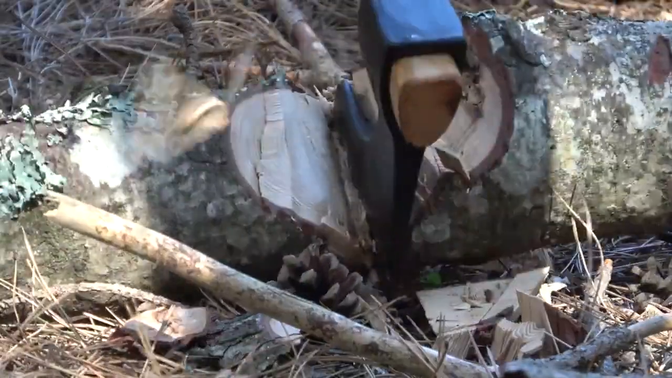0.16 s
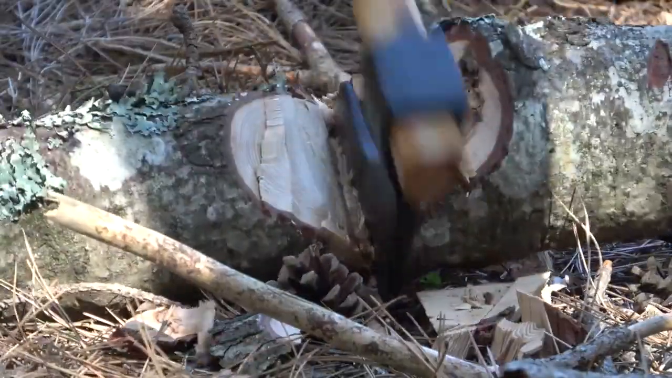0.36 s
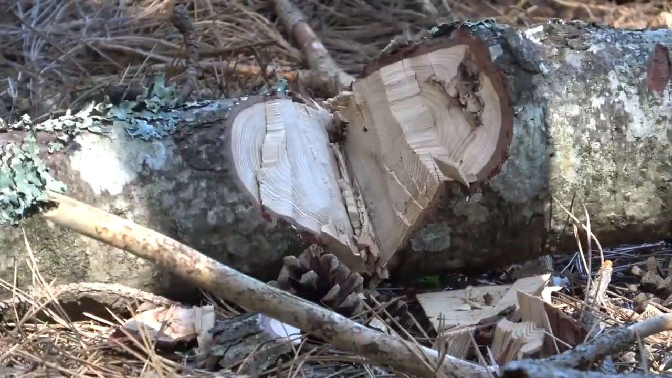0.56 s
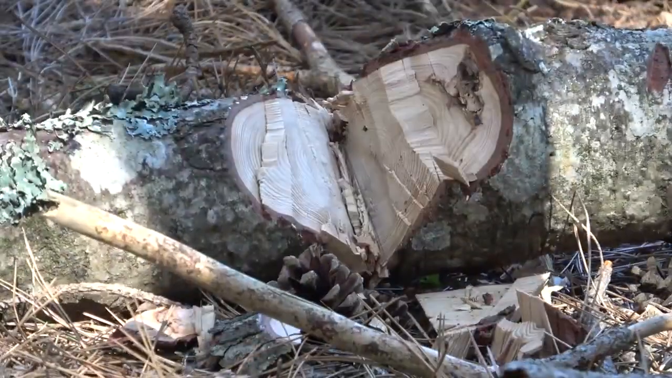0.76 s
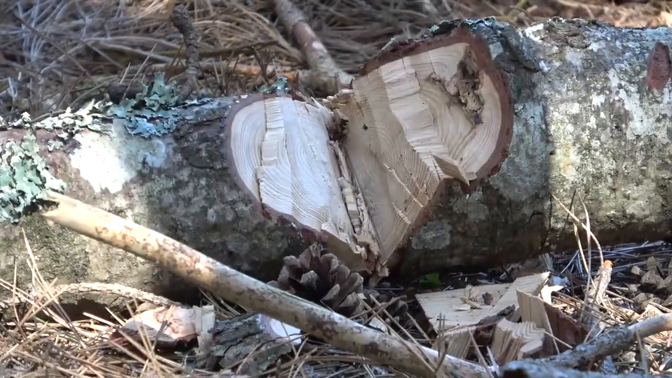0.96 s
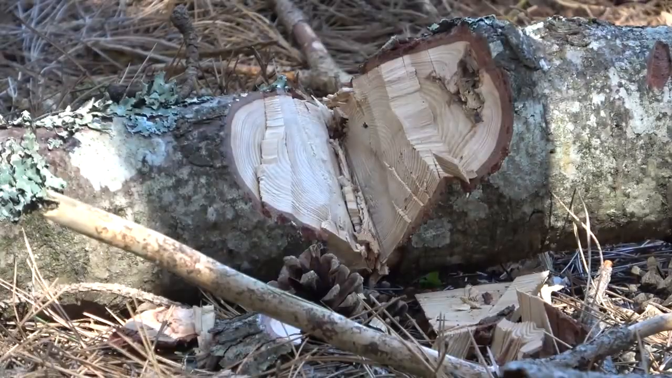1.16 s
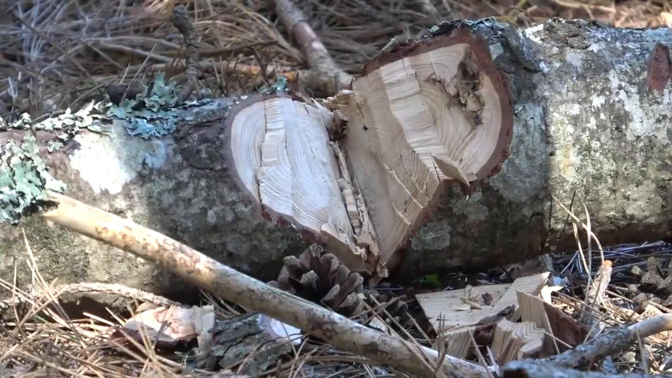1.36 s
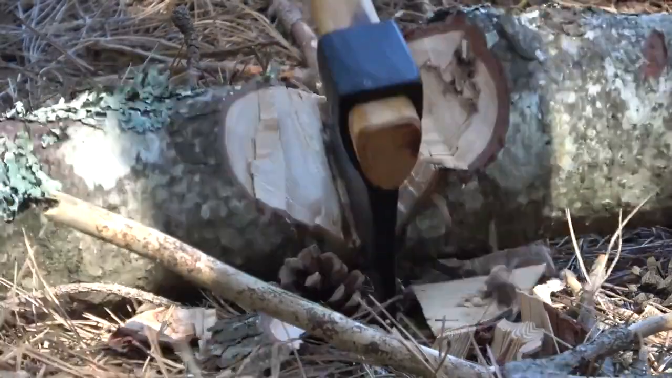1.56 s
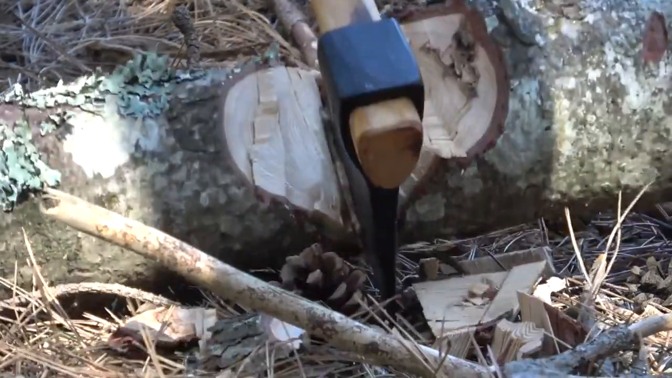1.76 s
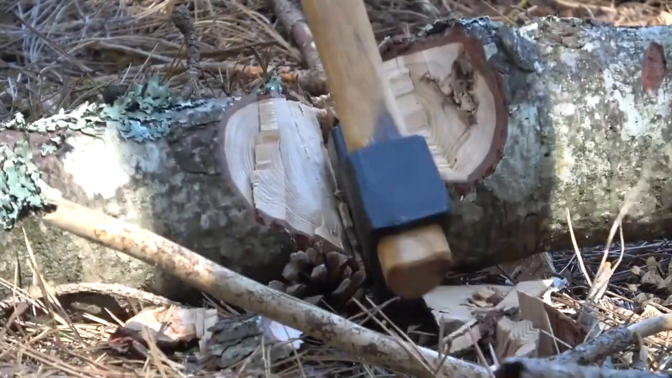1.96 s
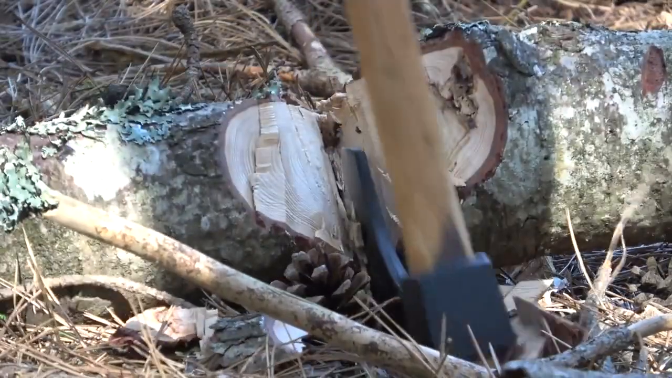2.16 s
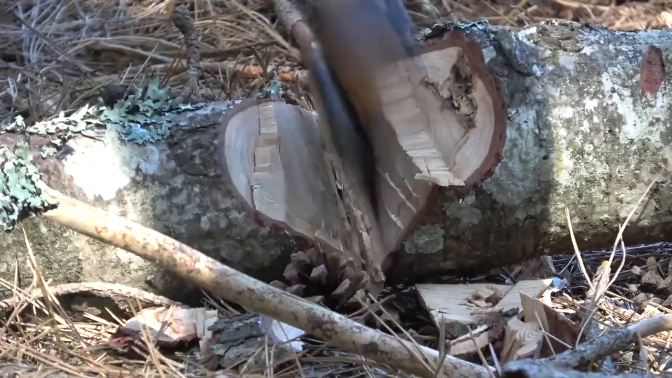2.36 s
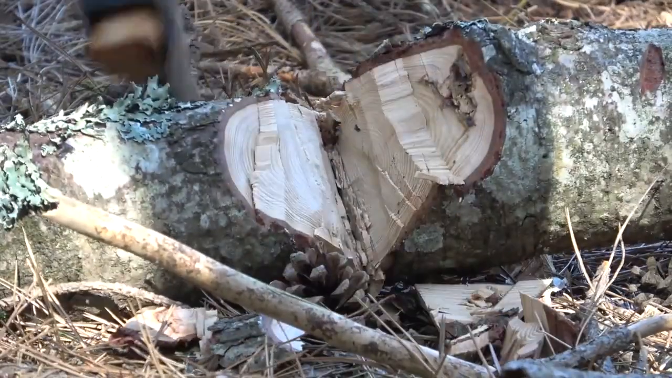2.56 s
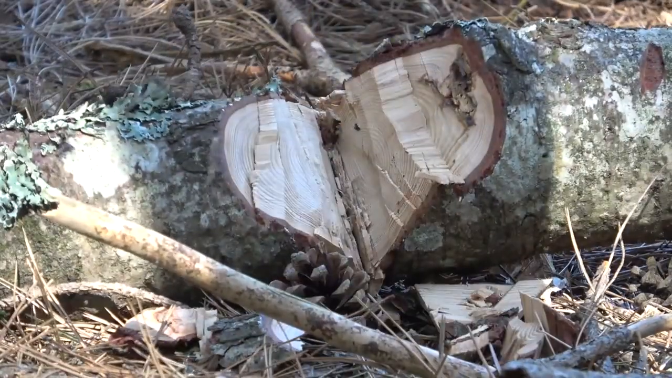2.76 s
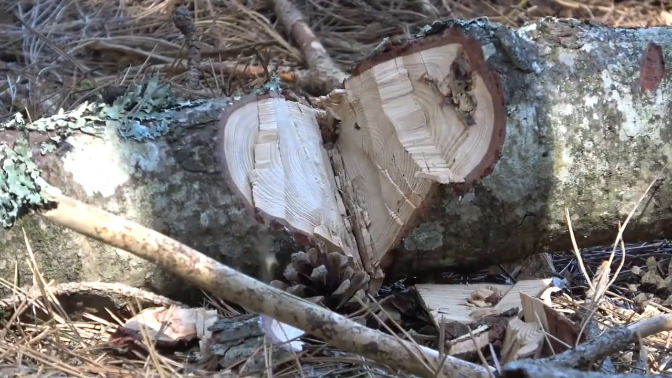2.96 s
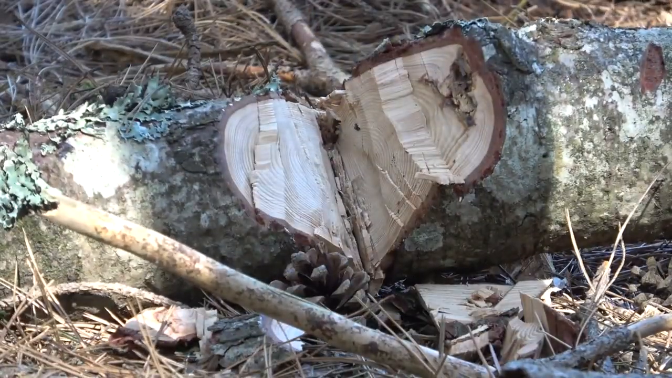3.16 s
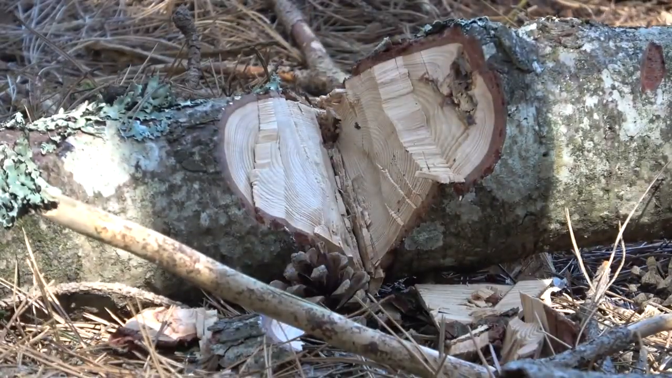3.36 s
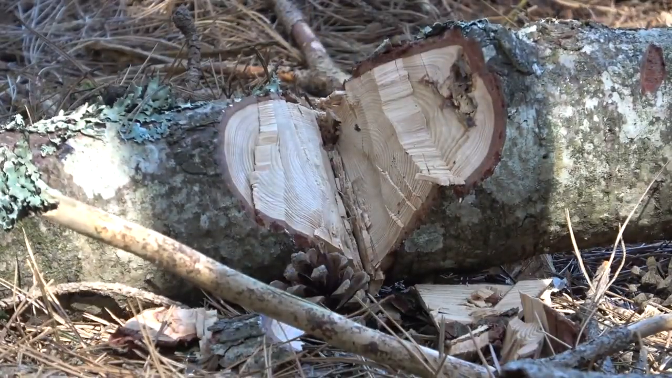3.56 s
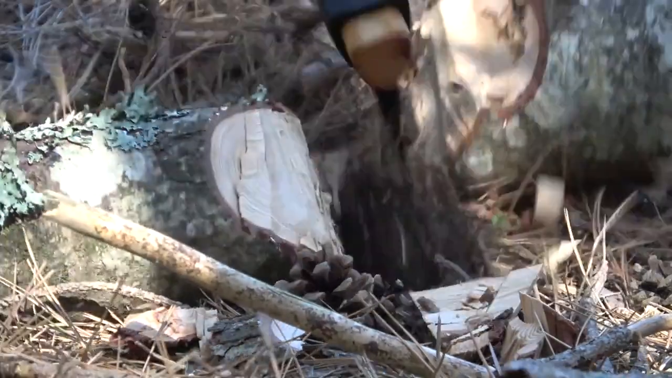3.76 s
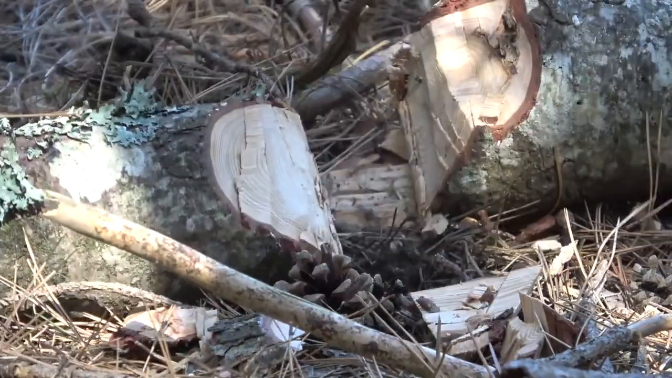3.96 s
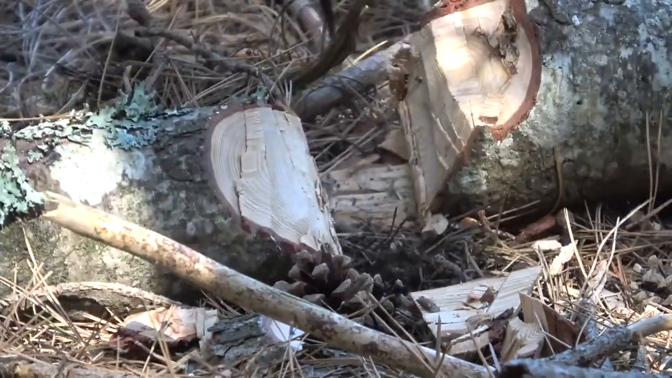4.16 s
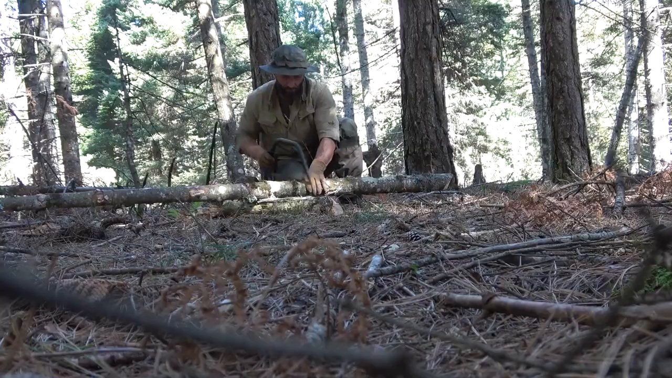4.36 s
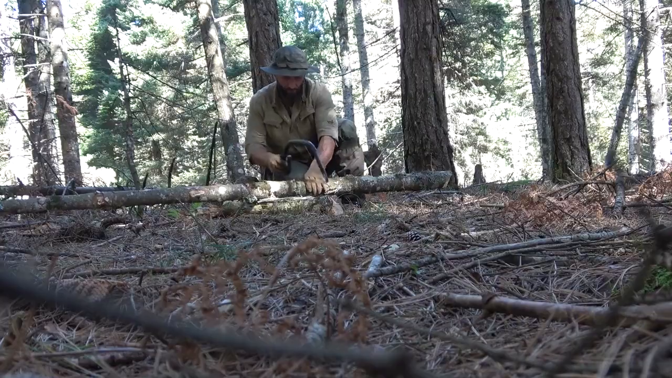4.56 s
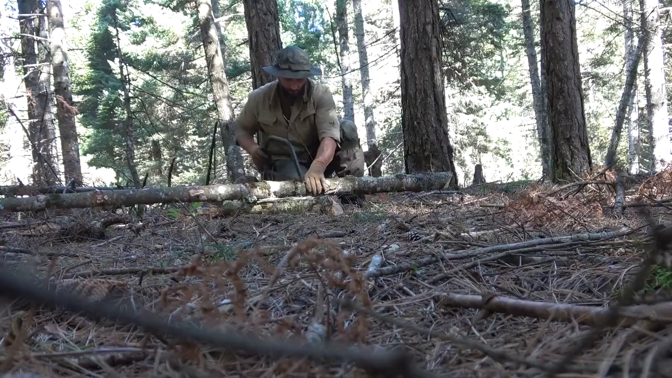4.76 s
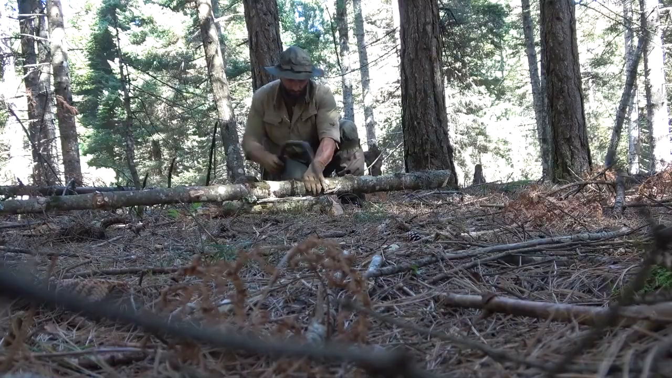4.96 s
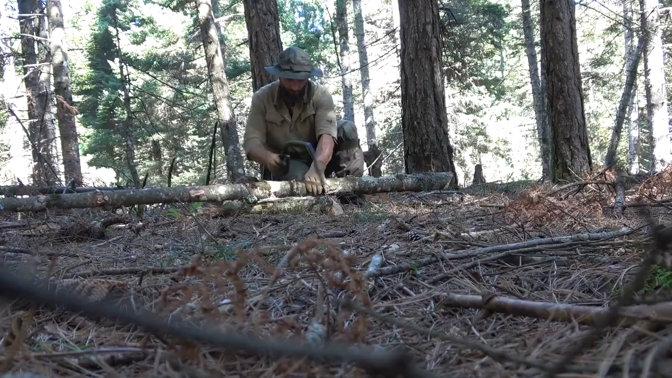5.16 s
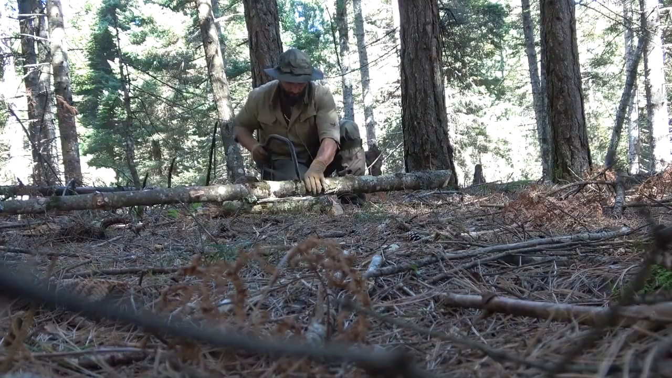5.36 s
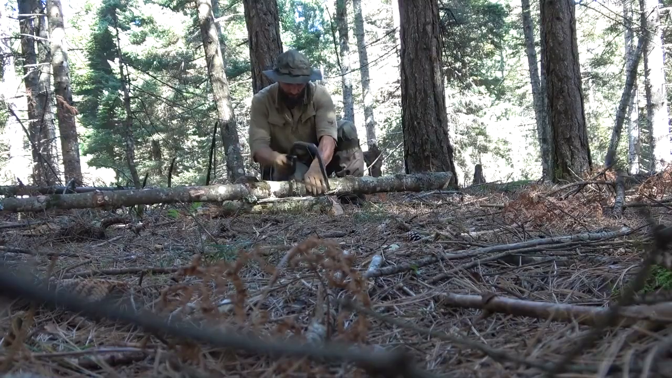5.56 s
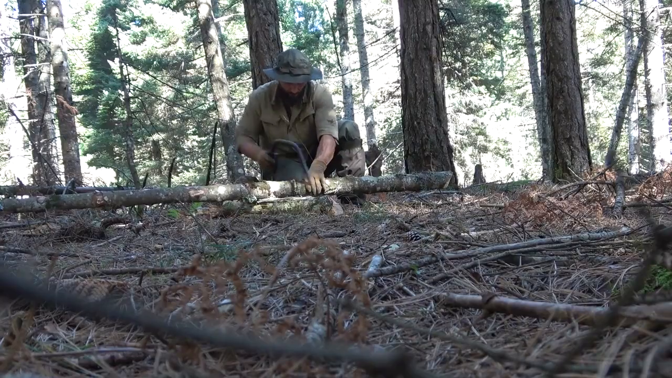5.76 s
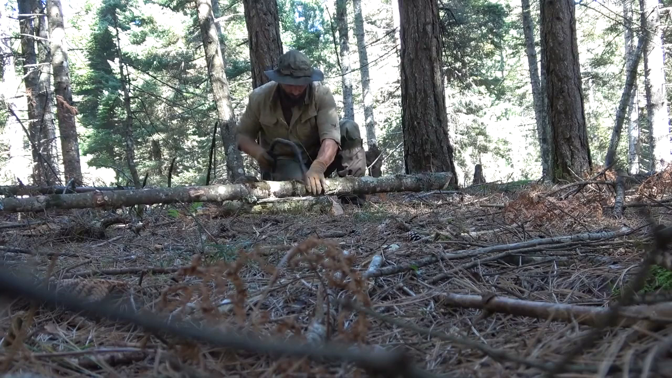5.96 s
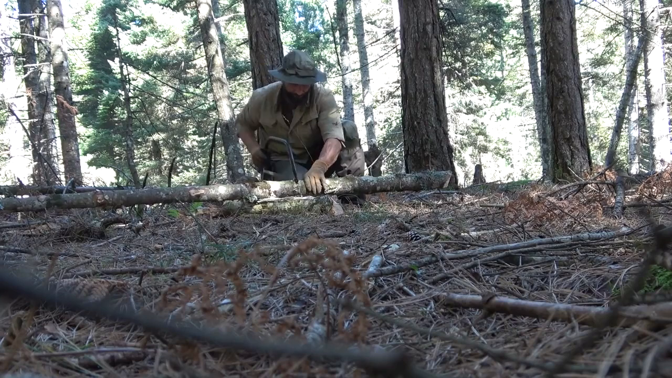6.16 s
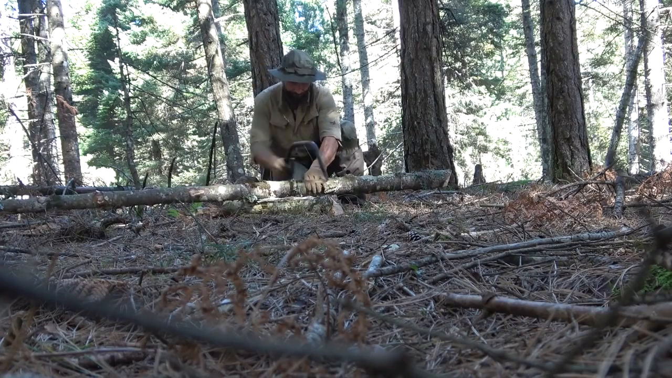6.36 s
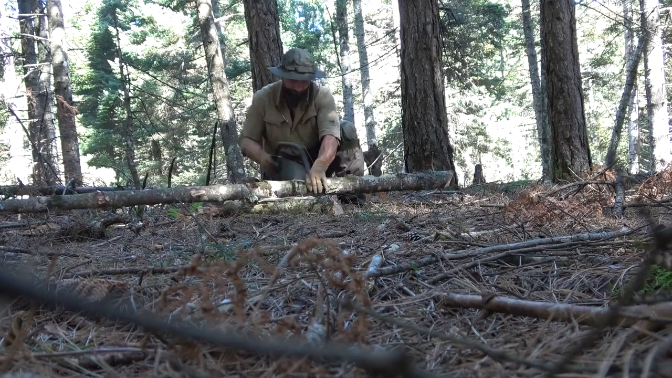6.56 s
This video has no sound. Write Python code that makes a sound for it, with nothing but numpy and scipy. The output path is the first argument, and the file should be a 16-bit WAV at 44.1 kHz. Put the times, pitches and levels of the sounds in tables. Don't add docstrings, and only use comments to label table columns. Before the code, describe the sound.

Three heavy axe chops and one light tap split wood outdoors, chips pattering, followed by more distant uneven sawing over soft wind hush.

```python
import sys
import numpy as np
from scipy import signal
from scipy.io import wavfile
from scipy.ndimage import uniform_filter1d

SR = 44100
rng = np.random.default_rng(int(sys.argv[2]) if len(sys.argv) > 2 else 0)


def convert_level_to_amplitude(level_db):
    exponent = np.asarray(level_db, float) / 20
    return 10 ** exponent


def int16_out(signal):
    q = np.round(np.clip(np.atleast_2d(signal).T, -1, 1) * 32767)
    wavfile.write(sys.argv[1], SR, q.astype(np.int16))


N = 292383


def evened(x):
    return x / np.sqrt(np.mean(x ** 2) + 1e-20)


def read(points, hz):
    f, value = np.transpose(points)
    return np.interp(np.log(hz + 1), np.log(f + 1), value)


def add(mix, start_s, sound):
    part = mix[..., round(start_s * SR):][..., :sound.shape[-1]]
    part += sound[..., :part.shape[-1]]


def left_right(pan_db):
    return convert_level_to_amplitude(np.array([[pan_db], [-pan_db]]) / 2)


def resonate(x, hz, width_hz):
    r = np.exp(-np.pi * width_hz / SR)
    pole = r * np.exp(2j * np.pi * hz / SR)
    return 2 * signal.lfilter([1 - r], [1, -pole], x).real


def resonate_twice(x, hz, width_hz):
    return resonate(resonate(x, hz, width_hz), hz, width_hz)


def body(x, modes):
    total = 0
    for k, (hz, width_hz, level_db) in enumerate(modes):
        total = total + (-1) ** k * convert_level_to_amplitude(level_db) * resonate_twice(x, hz, 1.6 * width_hz)
    return total


def noise(length, gain, same, patchy_db=1.5, size=512):
    hop, hz = size // 4, np.fft.rfftfreq(size, 1 / SR)
    frames = length // hop + 5
    a, b, c, d, patches = rng.standard_normal((frames, len(hz), 5)).T
    patches = uniform_filter1d(patches, size=6, axis=0)
    patches = evened(uniform_filter1d(patches, size=10, axis=1))
    like = np.clip(read(same, hz), -1, 1)[:, None]
    left, other = a + 1j * b, c + 1j * d
    spectra = np.array([left, like * left + np.sqrt(1 - like ** 2) * other])
    spectra *= gain(hz[:, None], np.arange(frames) * hop / SR) * convert_level_to_amplitude(patchy_db * patches)
    return signal.istft(spectra, nperseg=size, noverlap=size - hop)[1][:, :length]


def crackle(size, per_s, spread_db):
    heights = convert_level_to_amplitude(spread_db * np.minimum(rng.exponential(1, size), 4))
    return rng.standard_normal(size) * heights * (rng.random(size) < per_s / SR)


# pitch_hz [Hz], level_db [dB per Hz]
WIND_COLOUR = [(15, -61), (25, -23), (68, -2), (120, -7.5), (280, -12), (430, -6), (640, -5), (750, -12.5),
               (1000, -9), (1340, -8), (1600, -16.5), (4250, -21.5), (11600, -23.5), (16000, -30)]
# pitch_hz [Hz], coherence [0-1]
WIND_SAME = [(60, .9), (290, .65), (700, .85), (1500, .9), (2000, .995), (4900, .995), (5500, .45),
             (11000, .5), (15000, .9)]


def air():
    hush = noise(N, lambda f, u: convert_level_to_amplitude(read(WIND_COLOUR, f)) + 0 * u, WIND_SAME, patchy_db=2.3, size=2048)
    return convert_level_to_amplitude(-57.5) * evened(hush)


# pitch_hz [Hz], t60_s [s]
NEAR_TREES = [(60, .45), (250, 0.26), (700, 0.49), (2000, 0.46), (6000, 0.4), (15000, 0.31)]
# pitch_hz [Hz], coherence [0-1]
ECHO_SAME = [(60, .98), (640, .9), (1500, .94), (2200, .97), (4700, .985), (5500, .7), (11000, .6),
             (15000, .8)]


def forest(x):
    tail = noise(SR // 2, lambda f, u: convert_level_to_amplitude(-60 * u / read(NEAR_TREES, f)), ECHO_SAME, patchy_db=3.5)
    tail[:, :400] = 0
    return signal.fftconvolve(x, tail / np.linalg.norm(tail[0]), axes=1)[:, :N]


# peak_s [s], high_db [dB], low_db [dB],
# rise_s [s per 20 dB], fall_s [s per 20 dB]
RUSTLES = [(.5, -51, -46, .01, .1), (.8, -61, -60, .4, .25), (1.43, -46, -47, .11, .1),
           (1.86, -47, -45, .03, .3), (2.25, -49, -54, .5, .2), (2.514, -45, -55, .15, .3),
           (2.688, -43, -65, .06, .01), (2.95, -59, -56, .16, .9), (3.672, -45, -44.5, .18, .01)]


def rustle():
    t = np.arange(N) / SR
    swells = []
    for peak_s, _, _, rise_s, fall_s in RUSTLES:
        swells.append(convert_level_to_amplitude(-20 * np.maximum((peak_s - t) / rise_s, (t - peak_s) / fall_s)))
    high_gain, low_gain = convert_level_to_amplitude(np.transpose(RUSTLES)[1:3]) @ np.array(swells)
    grains = crackle(N, 7000, 1.6)
    high = evened(body(grains, [(2600, 5000, 1.5), (8000, 4900, 2)]))
    low = evened(body(grains[::-1], [(463, 550, 1), (1186, 1000, -4.5), (2100, 800, -6)]))
    return high * high_gain * convert_level_to_amplitude(-6.5) + low * low_gain * convert_level_to_amplitude(-3.5)


# start_s [s], level_db [dB peak], pitch_hz [Hz], pan_db [dB left-right]
SNAPS = [(0.2094, -29, 4660, 9), (0.2594, -35, 4670, -1.5), (0.31, -39, 4610, 0.0), (0.3885, -37, 7200, 11),
         (0.4468, -30, 3920, 4), (0.475, -17, 4100, 0.5), (0.5766, -39, 6680, 1.0), (0.611, -41, 3670, -6),
         (0.6542, -43, 7850, 8), (0.6714, -39, 3720, 8), (0.811, -43, 4620, 7), (1.3823, -29, 5170, -2),
         (1.7594, -42, 3880, 1.0), (1.8044, -41, 3520, 1.5), (1.888, -33, 8440, 13),
         (1.9194, -30, 7200, 0.5), (1.9393, -27.5, 6900, 5), (1.959, -34, 7600, -1),
         (1.9929, -29, 3850, -0.5), (2.055, -37, 4750, 2), (2.1119, -41, 4500, 0.),
         (2.163, -34.5, 5960, 14), (2.223, -32, 4400, 4), (2.2638, -27.5, 4670, 8), (2.3166, -43, 4190, 6),
         (2.405, -39, 4270, 4), (2.6569, -42, 5630, -7), (2.866, -48, 6500, 0.), (2.8988, -34, 6750, 0.0),
         (2.911, -45, 7500, 0.), (3.0104, -28.5, 7200, 2), (3.9449, -33, 3540, 3)]
# start_s [s], level_db [dB peak], pitch_hz [Hz], pan_db [dB left-right]
CATCHES = [(4.2674, -32, 7550, 0.0), (4.3006, -36, 6150, 1), (4.4386, -20, 4620, -1),
           (4.968, -33, 7000, 0.), (4.9861, -25, 5500, 1), (5.228, -36, 5000, 0.), (5.35, -19, 5000, 0.),
           (5.5093, -25, 6820, .4), (6.336, -25, 7010, .4)]


def snap(level_db, pitch_hz, pan_db):
    t = np.arange(500) / SR
    burst = rng.standard_normal(500) * np.exp(-t / 0.0017)
    burst = resonate_twice(burst, .9 * pitch_hz, .85 * pitch_hz)  + 0 * t
    burst = burst + .2 * resonate(burst, 1800, 1600)
    burst = resonate(np.diff(burst, prepend=0), 0, 14000)
    return convert_level_to_amplitude(level_db - 2.5) * burst / abs(burst).max() * left_right(pan_db)


# start_s
# [s], level_db [dB peak], pitch_hz [Hz], t60_s [s]
KNOCKS = [(1.962, -33, 242, 0.06), (1.992, -30.5, 236, 0.026), (2.006, -38, 254, 0.048),
          (2.018, -36, 226, 0.05), (2.109, -40, 244, 0.076), (2.131, -41, 213, 0.052),
          (2.227, -40, 420, 0.026), (2.243, -40, 222, 0.063), (2.348, -45, 403, 0.026),
          (2.989, -49, 420, 0.067), (4.268, -36, 424, 0.044), (4.298, -35, 209, 0.023),
          (4.574, -30, 275, .05), (4.854, -36, 200, 0.04), (4.909, -35, 119, 0.049),
          (5.802, -33, 450, 0.062), (6.159, -30, 358, 0.046), (6.204, -33.5, 415, 0.032),
          (6.34, -33.5, 473, 0.039), (6.498, -33.5, 350, 0.043), (6.535, -34.5, 220, 0.055),
          (0.0195, -15, 312, .02), (1.4707, -9.5, 300, 0.017), (2.7035, -14.5, 388, 0.019),
         (3.668, -18, 330, 0.02), (5.7039, -24, 430, 0.033), (5.705, -27, 270, .03),
         (6.2425, -26, 330, 0.02), (5.846, -30, 428, 0.032), (6.245, -29, 200, 0.035),
         (6.252, -35, 150, .04), (4.42, -44, 95, .12), (4.71, -47, 65, .2), (5.49, -46, 90, .08)]


def knock(level_db, pitch_hz, t60_s):
    t = np.arange(4000) / SR
    modes = np.sin(2 * np.pi * pitch_hz * t)
    modes += 0.5 * np.sin(2 * np.pi * 1.574 * pitch_hz * t) * convert_level_to_amplitude(-20 * t / t60_s)
    modes += 0.25 * evened(body(rng.standard_normal(4000), [(1.4 * pitch_hz, 300, 0)]))
    soft_push = np.sin(np.pi / 2 * np.minimum(t / 0.003, 1)) ** 2
    modes *= convert_level_to_amplitude(-60 * t / max(t60_s, .01)) * soft_push
    modes = signal.sosfilt(signal.butter(4, 530., fs=SR, output="sos"), modes)
    return convert_level_to_amplitude(level_db) * modes / abs(modes).max()


# start_s [s], end_s [s], level_db [dB], slips_per_s [1/s], pitch_hz [Hz]
SQUEAKS = [(0.454, .4755, -28.5, 780, 2460), (0.483, 0.496, -30, 1200, 2100),
           (2.689, 2.701, -37, 800, 2500), (2.962, 2.971, -50, 350, 1100), (1.991, 2.003, -52, 410, 3600)]


def squeak(start_s, end_s, level_db, slips_per_s, pitch_hz):
    size = round((end_s - start_s) * SR)
    wander = 1 + .8 * uniform_filter1d(rng.standard_normal(size), size=60)
    turns = np.cumsum(slips_per_s * wander) / SR
    slips = rng.standard_normal(size) * (0.095 + np.exp(-(turns % 1) / 0.18))
    scrape = resonate_twice(slips, pitch_hz, 1.05 * pitch_hz) + 0.005 * slips
    scrape = evened(np.diff(scrape, prepend=0))
    scrape = scrape + .32 * evened(resonate_twice(slips, 700, 800))
    return convert_level_to_amplitude(level_db) * evened(scrape) * signal.windows.tukey(size, .3)


# start_s [s], pitch_hz [Hz], level_db [dB], t60_s [s]
RINGS = [(.51, 6660, -46, 0.12), (1.407, 700, -36.5, 0.032), (2.072, 1600, -43, .04),
         (2.162, 2200, -36, 0.018), (2.404, 3450, -50.5, 0.098), (2.598, 3390, -46, 0.097),
         (2.604, 5550, -47, 0.12), (2.715, 6660, -41, 0.22), (2.775, 6660, -51, .5), (2.76, 4250, -55, .3),
         (2.715, 3390, -46, .15), (3.82, 6660, -45, .3), (3.865, 6660, -40, 0.22),
         (3.842, 1320, -25, 0.047)]
# start_s [s], pitch_hz [Hz], level_db [dB], t60_s [s]
SPLITS = [(.0255, 480, -11, .03), (.026, 2700, -14, .02), (.0365, 420, -7, .04), (.043, 380, -8, .04),
          (.049, 400, -4, .06), (.063, 480, -13, .03), (.0645, 2500, -14, .02), (.082, 2850, -15, .03),
          (1.4775, 480, -5, .025), (1.487, 380, -6, .03), (1.494, 420, -7, .04), (1.5, 430, -7, .04),
          (1.51, 350, -11, .03), (1.528, 1600, -13, .02), (1.542, 420, -12, .03), (1.551, 600, -13, .03),
          (3.6765, 330, -4, .02), (3.6765, 850, -11, .02), (3.684, 400, -3, .02), (3.687, 900, -12, .025),
          (3.696, 330, -4, .03), (3.708, 420, -14, .05), (3.712, 1300, -12, .025), (3.724, 300, -14, .04),
          (3.748, 1100, -17, .02), (3.782, 200, -18, .06)]


def ring(pitch_hz, level_db, t60_s):
    t = np.arange(SR // 3) / SR
    return convert_level_to_amplitude(level_db - 60 * t / t60_s) * np.sin(2 * np.pi * pitch_hz * t) * (1 - np.exp(-t / 0.001))


# start_s [s], teeth_per_s [1/s], level_db [dB]
HUMS = [
    [(4.475, 320, -44), (4.5, 350, -40), (4.54, 450, -39), (4.585, 390, -44)],
    [(4.72, 450, -46), (4.745, 470, -44), (4.775, 500, -50)],
    [(5.01, 245, -46), (5.05, 320, -36), (5.072, 345, -50), (5.115, 400, -41), (5.14, 360, -42)],
    [(5.33, 270, -48), (5.37, 225, -44), (5.41, 185, -44)],
    [(5.54, 260, -42), (5.565, 290, -36), (5.6, 360, -38), (5.63, 320, -37), (5.665, 350, -42)],
    [(5.86, 320, -48), (5.9, 230, -47), (5.95, 160, -52)],
    [(6.065, 255, -44), (6.082, 280, -35), (6.105, 350, -29), (6.14, 375, -31)],
    [(6.38, 290, -44), (6.41, 340, -39), (6.445, 375, -38), (6.475, 410, -46)],
]


def teeth(run):
    s, teeth_per_s, level_db = np.transpose(run)
    t = np.arange(s[0] - .01, s[-1] + .01, 1 / SR)
    wander = 1 + 0.6 * uniform_filter1d(rng.standard_normal(len(t)), size=200)
    turns = np.cumsum(np.interp(t, s, teeth_per_s) * wander) / SR
    grain = convert_level_to_amplitude(2.6 * evened(resonate(rng.standard_normal(len(t)), 0, 47)))
    hum = np.sqrt(2) * np.cos(2 * np.pi * turns) * grain
    return t[0], hum * convert_level_to_amplitude(np.interp(t, s, level_db)) * signal.windows.tukey(len(t), .3)


# start_s [s], level_db [dB]
PUSHES = [
    [(4.4, -59), (4.406, -53), (4.434, -50), (4.438, -39), (4.522, -29), (4.586, -36), (4.598, -45),
     (4.68, -57)],
    [(4.95, -52), (4.984, -48), (4.988, -38), (5.008, -41), (5.032, -33), (5.092, -29), (5.126, -33),
     (5.16, -47), (5.22, -55)],
    [(5.48, -55), (5.506, -48), (5.511, -38), (5.53, -41), (5.588, -30), (5.654, -28), (5.66, -37),
     (5.7, -46), (5.745, -53)],
    [(6.01, -54), (6.044, -42), (6.084, -31), (6.112, -26), (6.138, -31), (6.188, -31), (6.286, -53),
     (6.31, -54)],
    [(6.32, -54), (6.342, -40), (6.42, -26), (6.426, -29), (6.476, -25), (6.496, -37), (6.558, -48),
     (6.57, -47)],
    [(6.575, -47), (6.597, -48), (6.63, -33)],
]
# start_s [s], level_db [dB]
PULLS = [
    [(4.263, -51), (4.271, -39), (4.289, -44), (4.303, -38), (4.343, -54), (4.39, -62)],
    [(4.685, -55), (4.727, -39), (4.765, -41), (4.779, -34), (4.787, -39), (4.855, -39), (4.859, -36),
     (4.933, -56), (4.945, -57)],
    [(5.225, -51), (5.259, -47), (5.279, -36), (5.299, -40), (5.327, -34), (5.339, -38), (5.347, -33),
     (5.409, -39), (5.475, -56)],
    [(5.75, -55), (5.812, -34), (5.822, -39), (5.872, -33), (5.94, -38), (5.946, -44), (5.992, -55),
     (6.005, -54)],
]
# pitch_hz [Hz], level_db [dB per Hz]
RASP_COLOUR = [(110, -16), (290, -8), (540, -10), (680, -20), (933, -17), (1090, -10), (1300, -10.5),
               (2810, -2), (3490, -7.5), (5710, -2), (11600, -17), (13100, -17), (16000, -24)]
# pitch_hz [Hz], coherence [0-1]
RASP_SAME = [(700, .97), (2000, .999), (4800, .999), (6000, .985), (12000, .99)]
# pitch_hz [Hz], width_hz [Hz], level_db [dB]
BLADE_PUSH = [(2060, 130, -12), (2900, 160, -3), (5880, 200, -10), (7600, 230, -16), (12800, 550, -5)]
# pitch_hz [Hz], width_hz [Hz], level_db [dB]
BLADE_PULL = [(2880, 130, -6), (4150, 160, -27), (5900, 200, -22), (10150, 400, -8)]
# pitch_hz [Hz], width_hz [Hz], level_db [dB]
BRANCH = [(130, 44, -16), (260, 116, 0.5), (433, 130, 2), (567, 66, -6)]


def saw():
    stroke_s = .535
    push_judder_db, pull_judder_db = -6, -1.5
    judder_follows, pivot_db = .75, -32
    t = np.arange(4.263, N / SR, 1 / SR)
    size = len(t)
    points = sorted(point for stroke in PUSHES + PULLS for point in stroke)
    effort_db = np.interp(t, *np.transpose(points))
    push = np.clip(.5 + 2 * np.cos(2 * np.pi * (t - 4.53) / stroke_s), 0, 1)

    shake_db = pivot_db + judder_follows * (effort_db - pivot_db)
    shake_db = shake_db + pull_judder_db + (push_judder_db - pull_judder_db) * push
    middle, aside = (evened(body(crackle(size, 1500, 2.2), BRANCH)) for _ in range(2))
    judder = (middle + 0.22 * aside * [[1], [-1]]) * convert_level_to_amplitude(shake_db - 5.8)

    hiss = evened(noise(size, lambda f, u: convert_level_to_amplitude(read(RASP_COLOUR, f)) + 0 * u, RASP_SAME, patchy_db=2.0))
    bites = evened(resonate(rng.standard_normal(size), 353, 170))
    snags = evened(resonate(rng.standard_normal(size), 0, 78))
    grit = evened(abs(resonate(crackle(size, 600, 3.), 0, 400)))
    puffs = hiss * convert_level_to_amplitude(1.9 * bites + 1.1 * snags) * (1 + .16 * grit)
    blade = push * body(puffs, BLADE_PUSH) + (1 - push) * body(puffs, BLADE_PULL)
    rasp = evened(puffs + 1.5 * blade) * convert_level_to_amplitude(effort_db + .6)
    return t[0], (judder + rasp) * np.minimum((t - t[0]) / .005, 1)


# start_s [s], crack_db [dB], crack_hz [Hz], boom_db [dB], echo_db [dB], tear_s [s]
CHOPS = [
    (0.0244, -15, 6000, -17, -18, 0.04),
    (1.477, -16, 6300, -14, -19, 0.032),
    (2.703, -13.5, 2140, -21, -41.5, 0.0092),
    (3.6739, -11.5, 7000, -24, -19, 0.045),
]
# pitch_hz [Hz], level_db [dB per Hz]
CHOP_COLOURS = [
    [(24, -33), (40, -10), (112, 3.5), (151, -1.5), (503, -8.5), (630, -8.5), (990, -9), (1630, -7),
     (2100, -13), (2330, -8), (2600, -5), (2850, -1), (3150, -11), (3900, -13), (4460, -10), (5050, -17),
     (10400, -23.5), (16000, -37)],
    [(24, -44.5), (40, -16), (77, -3), (243, -2), (455, -7), (663, -6.5), (1090, -10.5), (1630, -9),
     (7930, -24), (13100, -32), (16000, -42)],
    [(24, -33), (40, -1), (276, -1), (852, -25), (1440, -17.5), (3560, -18), (5870, -21), (6820, -20.5),
     (16000, -45)],
    [(24, -51), (40, -15.5), (199, -1.5), (262, -9), (556, -13), (663, -13.5), (831, -12), (1240, -14),
     (4930, -19.5), (12500, -33.5), (16000, -52)],
]
# pitch_hz [Hz], width_hz [Hz], level_db [dB]
LOG = [
    [(78.5, 62, -11), (300, 106, -2), (400, 110, 4), (566, 20, -17)],
    [(75, 26, -10.5), (194, 65, -5.5), (270, 70, -2.5), (420, 103, -0.5), (660, 43, -4)],
    [(80, 79, 5), (200, 120, -2), (420, 180, 0)],
    [(70, 37, -12), (177, 43, -4), (291, 30, 4), (439, 80, -0.5), (670, 110, -10)],
]
ECHO_HOLDS = [.06, .07, .03, .055]
# pitch_hz [Hz], t60_s [s]
FAR_TREES = [(60, 0.4), (500, 1.83), (2000, 1.55), (6000, 1.24), (15000, 1.6)]
LOG_PAN_DB = 1.7


def chop(row, colour, log, hold_s):
    start_s, crack_db, crack_hz, boom_db, echo_db, tear_s = row
    lead_s = .016
    t = np.arange(SR) / SR
    late = np.maximum(t - lead_s, 0)
    struck = t >= lead_s
    crack = evened(body(rng.standard_normal(SR), [(crack_hz, .6 * crack_hz, 0), (2300, 1800, 3.5)]))
    crack = convert_level_to_amplitude(crack_db) * crack * np.exp(-(late / 0.002) ** 0.89) * struck

    swell = 1 - .75 * np.exp(-late / .014)
    tearing = np.exp(-(late / tear_s) ** 2.6) * swell + 0.16 * np.exp(-late / (1.76 * tear_s))
    tearing = np.where(struck, tearing, 0.14 * np.minimum(t / 0.0017, 1))
    middle, aside = (evened(body(crackle(SR, 2500, 2.9), log)) for _ in range(2))
    boom = (middle + 0.4 * aside * [[1], [-1]]) * tearing * convert_level_to_amplitude(boom_db) * left_right(LOG_PAN_DB)

    def returned(f, u):
        near = convert_level_to_amplitude(-60 * np.maximum(u - hold_s, 0) / read(NEAR_TREES, f))
        far = convert_level_to_amplitude(-17.5 - 60 * u / read(FAR_TREES, f))
        return convert_level_to_amplitude(read(colour, f)) * (near + far)

    echo = noise(SR, returned, ECHO_SAME, patchy_db=0.96)
    echo /= np.sqrt(np.mean(echo[:, 1500:5000] ** 2))
    lumps = evened(resonate(rng.standard_normal(SR), 0, 250))
    lumps = convert_level_to_amplitude(2.0 * np.exp(-late / 0.09) * lumps)
    build = (1 - 0.82 * np.exp(-late / 0.014)) * struck
    ahead = resonate(echo, 0, 4500) * 0.34 * (t / lead_s) ** 2 * ~struck
    return start_s - lead_s, crack + boom + convert_level_to_amplitude(echo_db) * (echo * build * lumps + ahead)


def scene():
    small, large = np.zeros((2, N)), np.zeros((2, N))
    add(small, 0, rustle())
    for table, source in ((SNAPS + CATCHES, snap), (KNOCKS, knock), (RINGS, ring)):
        for start_s, *rest in table:
            add(small, start_s, source(*rest))
    for start_s, *rest in SPLITS:
        add(small, start_s, ring(*rest) * left_right(LOG_PAN_DB))
    for row in SQUEAKS:
        add(small, row[0], squeak(*row))
    for run in HUMS:
        add(small, *teeth(run))
    add(large, *saw())
    for blow in zip(CHOPS, CHOP_COLOURS, LOG, ECHO_HOLDS):
        add(large, *chop(*blow))
    return large + small + convert_level_to_amplitude(-15) * forest(small) + air()


# start_s [s], end_s [s], level_db [dB]
DROPOUT = (6.1329, 6.1375, -14)


def low_pass(x):
    return signal.sosfilt(signal.butter(12, 16510, fs=SR, output="sos"), x)


def record(dry):
    start_s, end_s, level_db = DROPOUT
    corners_s = [start_s - .0002, start_s, end_s - .003, end_s]
    gain = np.interp(np.arange(N) / SR, corners_s, [1, convert_level_to_amplitude(level_db), convert_level_to_amplitude(level_db), 1])
    bass_cut = signal.butter(2, 40., "high", fs=SR, output="sos")
    mix = signal.sosfilt(bass_cut, dry * gain)
    mix = signal.oaconvolve(mix, signal.firwin(255, 15850, fs=SR)[None], "same")
    return low_pass(mix)


dry = scene()
out = record(dry)
int16_out(out)
```